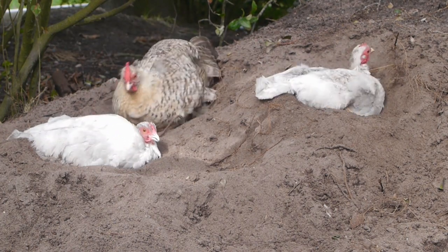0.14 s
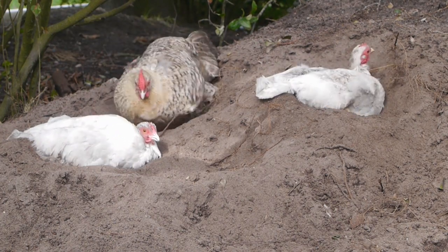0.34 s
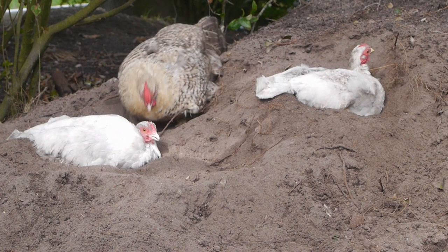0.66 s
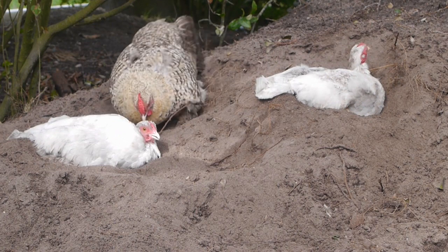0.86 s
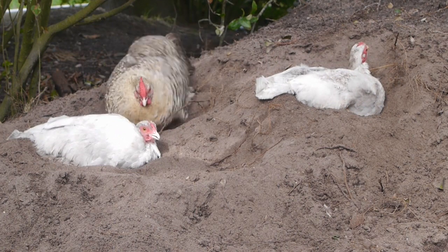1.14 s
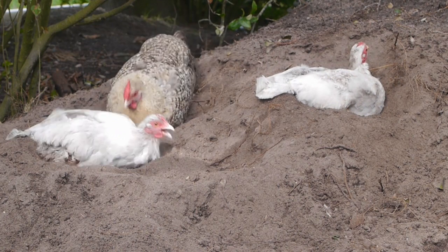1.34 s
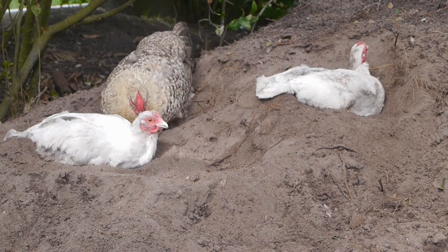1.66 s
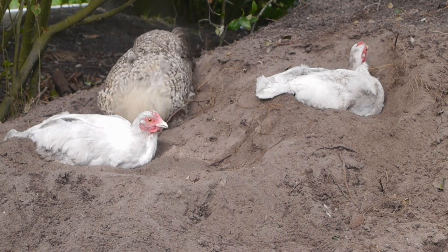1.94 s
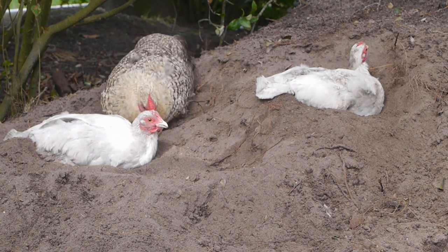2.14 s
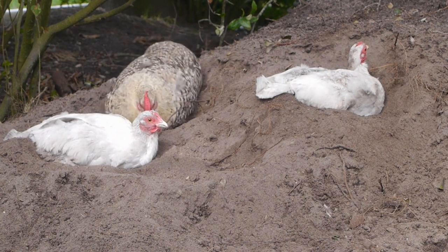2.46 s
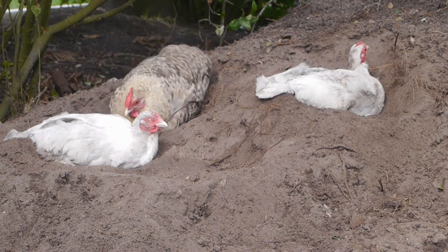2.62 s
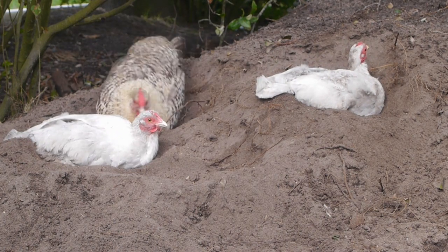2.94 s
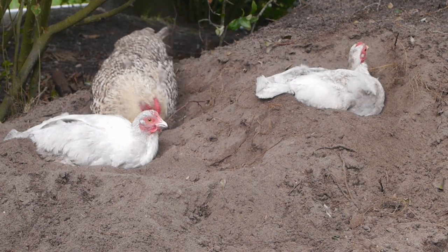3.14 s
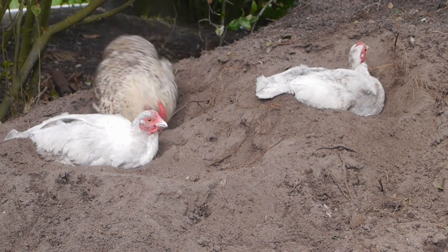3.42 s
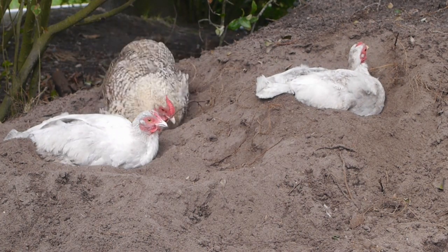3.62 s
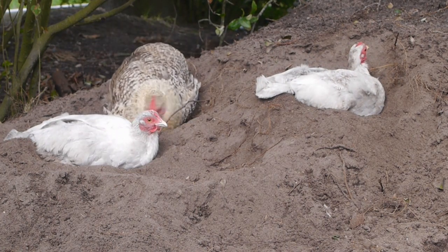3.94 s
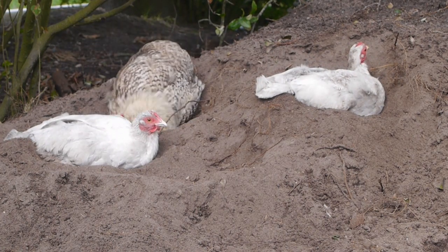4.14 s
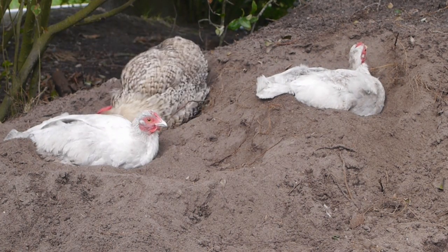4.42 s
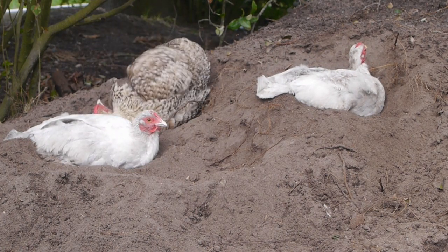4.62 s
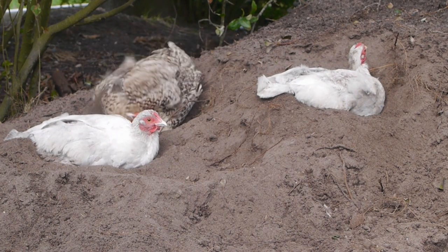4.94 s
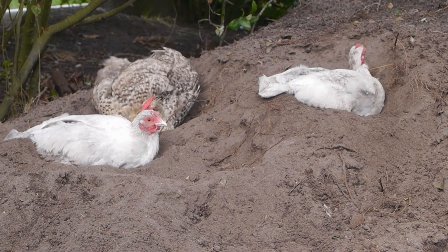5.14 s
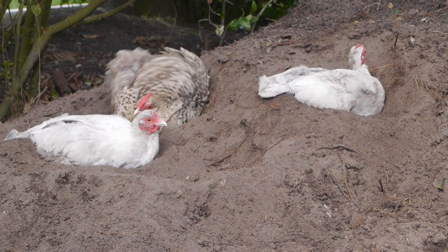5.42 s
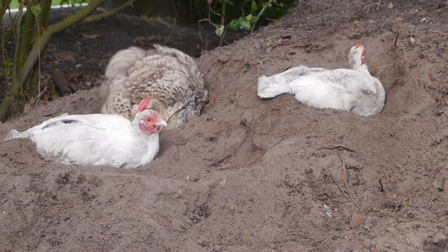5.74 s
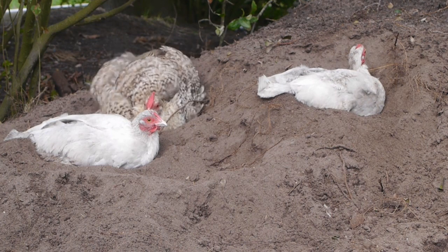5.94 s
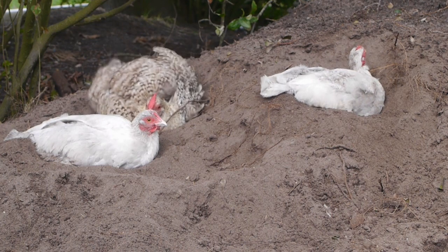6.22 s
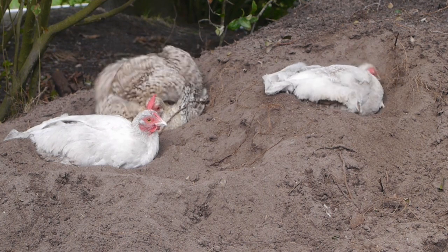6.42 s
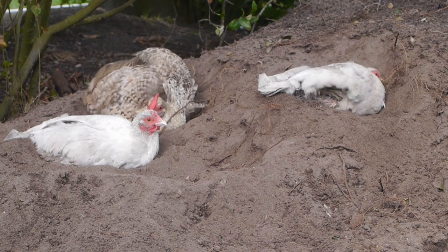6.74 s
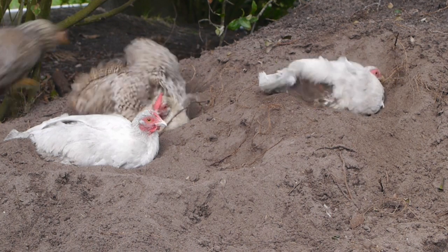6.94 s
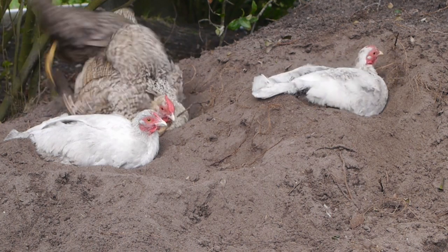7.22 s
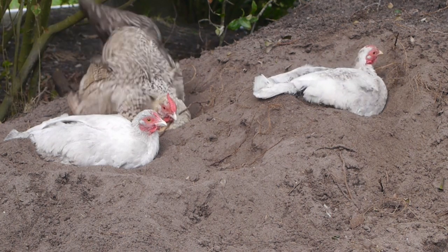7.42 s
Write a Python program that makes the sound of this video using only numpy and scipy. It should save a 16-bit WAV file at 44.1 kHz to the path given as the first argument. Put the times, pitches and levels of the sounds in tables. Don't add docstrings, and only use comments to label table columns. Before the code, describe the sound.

Two hens call in the first two seconds: low, wavering croons mixed with thin squeals breaking into yelps, then one explosive squawk, after which the background hiss briefly dips. Croons return around three seconds with a distant songbird. A lull follows, then a cluster of low clucks and a brief rough rasp from a third hen. Fairly close microphones in a slightly echoing yard, with leaves, distant traffic and occasional small pecks.

```python
import sys
import numpy as np
from scipy import signal
from scipy.fft import rfft, irfft
from scipy.io import wavfile
from scipy.ndimage import uniform_filter1d

SR = 44100
rng = np.random.default_rng(int(sys.argv[2]) if len(sys.argv) > 2 else 0)


def transcribe(u):
    v = np.clip(np.atleast_2d(u).T, -1, 1)
    q = np.round(v * 32767).astype(np.int16)
    wavfile.write(sys.argv[1], SR, q)


def gain_from_db(level_db):
    decades = np.asarray(level_db, float) / 20
    return 10 ** decades


N = 333837


def evened(x):
    return x / np.sqrt(np.mean(x ** 2) + 1e-20)


def read_curve(points, hz):
    f, value = np.transpose(points)
    return np.interp(np.log(hz + 1), np.log(f + 1), value)


def add(mix, start_s, sound):
    part = mix[round(start_s * SR):][:len(sound)]
    part += sound[:len(part)]


def wander(size, hz):
    low_pass = signal.butter(N=2, Wn=2 * hz / SR)
    return evened(signal.lfilter(*low_pass, rng.standard_normal(size + 800))[800:])


def unrolled(rows):
    s, *columns = np.transpose(rows)
    t = np.arange(s[0], s[-1], 1 / SR)
    return [t] + [np.interp(t, s, c) for c in columns]


def syllable(start, length, peak_db, hz, rule):
    attack, hold, start_db, end_db, rough_top, rough_ends, fall_db = rule
    share = np.clip([0, attack, attack + hold, 1], [0, .05, .1, 1], [0, .9, .97, 1])
    s = start + length * share
    ends = np.array([1, 0, 0, 1])
    level_db = peak_db + np.array([start_db, 0, 0, end_db])
    rough = np.abs(np.where(ends, rough_ends, rough_top))
    return unrolled(np.transpose([s, hz(s - start, ends), level_db, rough])) + [fall_db]


def voice(hz, level_db, rough, fall_db, throat, jitter, smear, uneven_db, rush):
    size = len(hz)
    shaken_hz = hz * (1 + jitter * rough * wander(size, 125) + 0.013 * wander(size, 86))
    turns = np.cumsum(shaken_hz) / SR
    out, power = np.zeros(size), np.zeros(size)
    for k in range(1, 17):
        weight = gain_from_db(read_curve(throat, k * hz) - 2 * fall_db * (1 - 1 / k)) * (k * hz < 14000)
        fuzz = wander(size, smear * hz.mean()) + 1j * wander(size, smear * hz.mean())
        share = np.clip(rough * k ** 0.59, 0, 1)
        shake = np.sqrt(1 - share ** 2) + share * fuzz / np.sqrt(2)
        shake *= gain_from_db(uneven_db * (k > 1) * np.clip(wander(size, 13.5), -2, 2))
        tone = np.exp(2j * np.pi * (k * turns + 0.56 * rng.random()))
        out += weight * (shake * tone).real
        power += weight ** 2 / 2
    air = rfft(rng.standard_normal(size)) * gain_from_db(read_curve(throat, np.fft.rfftfreq(size, 1 / SR)))
    out += rush * rough * np.sqrt(power) * evened(irfft(air, size))
    edge = signal.windows.tukey(size, min(1, 250 / size))
    return gain_from_db(level_db) * out / np.sqrt(power) * edge


# pitch_hz, level_db (per Hz)
HISS_COLOUR = [(15, -45), (25, -26), (55, -36), (101, -7), (156, -24), (193, -6.5), (246, -16.5), (368, -4),
               (495, -6), (782, -2.5), (1170, -2.5), (1340, -4.5), (2120, -8.5), (6910, -13.5),
               (15500, -33)]
HISS_DB = -44.5
# time_s, treble_db
BREEZE = [(0.0, -3.5), (0.6, -1.5), (1.3, -1.5), (2.0, 0), (4.1, -1.2), (5.5, -4.5), (6.8, -2.4),
          (7.57, 1.5)]
# start_s, length_s, rise_db
RUSTLES = [(1.487, 0.16, 6.5), (5.684, 2.24, 1.3)]
# pitch_hz, left_right_likeness (1 = same, below 0 = opposite phase)
LIKENESS = [(60, 0.152), (99, 0.7), (160, 0.83), (270, 0.6943), (450, 0.45), (740, -0.0068), (1220, -0.03),
            (2010, -0.33), (3330, -0.16), (5500, 0.067), (9080, 0.2), (15000, -0.14)]


def hiss():
    frames, hz = N // 256 + 5, np.fft.rfftfreq(1024, 1 / SR)
    a, b, c, d, patches = rng.standard_normal((frames, 513, 5)).T
    patches = evened(uniform_filter1d(uniform_filter1d(patches, size=14, axis=0), size=12, axis=1))
    flicker = evened(uniform_filter1d(rng.standard_normal(frames), size=4))
    t = np.arange(frames) * 256 / SR
    leaves_db = np.interp(t, *np.transpose(BREEZE))
    rustle_db = sum(db * np.sin(np.pi * np.clip((t - s) / length, 0, 1)) for s, length, db in RUSTLES)
    treble = np.clip(hz / 5000 - .7, 0, 1)[:, None]
    middle = np.clip(hz / 2500, 0, 1)[:, None] * (1 - treble)
    same = np.clip(read_curve(LIKENESS, hz), -1, 1)[:, None]
    left = a + 1j * b
    right = same * left + np.sqrt(1 - same ** 2) * (c + 1j * d)
    level_db = read_curve(HISS_COLOUR, hz)[:, None] + 1.07 * patches
    level_db = level_db + treble * (leaves_db + 1.23 * flicker) + middle * rustle_db
    z = np.array([left, right]) * gain_from_db(level_db)
    return gain_from_db(HISS_DB + 2.5) * evened(signal.istft(z, nperseg=1024, noverlap=768)[1][:, :N])


# pitch_hz, t60_s
YARD_DECAY = [(300, 0.098), (1000, 0.26), (2000, 0.17), (4000, 0.4), (8000, 0.41), (12000, 0.12)]


def yard(x):
    taps = np.zeros((2, SR))
    at = np.arange(400, SR - 20, 20) + rng.integers(0, 20, (2, (SR - 401) // 20))
    np.put_along_axis(taps, at, rng.choice([-1., 1.], at.shape), 1)
    taps[1] = 0.45 * taps[0] + 1.04 * taps[1]
    hz, t, z = signal.stft(taps, SR, nperseg=256)
    decay = gain_from_db(-60 * t / read_curve(YARD_DECAY, hz)[:, None])
    tail = signal.istft(z * decay, SR, nperseg=256)[1]
    return signal.fftconvolve(x[None], tail / np.linalg.norm(tail[0]), axes=1)[:, :N]


# start_s, length_s, first_hz, last_hz, level_db
BIRD_NOTES = [
    (3.202, 0.052, 6350, 6130, -49),
    (3.34, 0.044, 6500, 5870, -49),
    (3.497, 0.092, 6140, 5050, -54),
    (3.65, .06, 5740, 5170, -57),
]


def songbird():
    out = np.zeros(N)
    for s, length, first_hz, last_hz, db in BIRD_NOTES:
        hz = np.linspace(first_hz, last_hz, round(length * SR))
        add(out, s, gain_from_db(db) * np.hanning(len(hz)) * np.sin(2 * np.pi * np.cumsum(hz) / SR))
    return out


# start_s, knock_db, thud_db (low push), crack_db (dry tick)
PECKS = [
    (.485, -60, 8, -8),
    (1.767, -27, -44, -32),
    (4.09, -55, -40, 14),
    (6.778, -48, -30, 7),
    (7.329, -50, -30, 5),
]


def pecks():
    out, t = np.zeros(N), np.arange(900) / SR
    for s, db, thud_db, crack_db in PECKS:
        tick = gain_from_db(crack_db) * rng.standard_normal(len(t)) * np.exp(-t / 0.0019)
        tick += 1.1 * np.sin(2 * np.pi * 1300 * t) * np.exp(-t / 0.0011)
        thud = gain_from_db(thud_db) * np.sin(2 * np.pi * 60 * t) * np.hanning(len(t))
        add(out, s, gain_from_db(db) * (tick + thud))
    return out


# time_s, pitch_hz, level_db, roughness (0-1), overtone_fall_db
RASP = [
    (7.036, 371, -39, 0.45, -9),
    (7.055, 370, -34.5, .35, -3),
    (7.1, 356, -27.5, 0.42, -4),
    (7.148, 352, -29.5, 0.56, 4),
    (7.168, 340, -52, 0.8, 8),
]
# pitch_hz, gain_db
RASP_THROAT = [(350, -27), (730, 1), (1050, -3), (1400, 5), (1800, -8), (2300, -5), (3500, -17.5),
               (7000, -17), (12000, -28)]
THROB_FROM_S, THROB_HZ, THROB_DB, THROB_FALL_DB = 7.022, 52, 2.2, 7


def third_hen():
    out = np.zeros(N)
    t, hz, level_db, rough, fall_db = unrolled(RASP)
    throb = np.cos(2 * np.pi * THROB_HZ * (t - THROB_FROM_S) + .5 * wander(len(t), 25))
    level_db = level_db + THROB_DB * throb
    fall_db = fall_db + THROB_FALL_DB * throb
    add(out, t[0], voice(hz, level_db, rough, fall_db, RASP_THROAT,
                         jitter=.09, smear=.3, uneven_db=2.5, rush=.65))
    return out


SLACK_HZ, SLACK_ROUGH, TIGHT_HZ, TIGHT_ROUGH = 172, .42, 230, .1


def slack(hz):
    return np.interp(hz, [SLACK_HZ, TIGHT_HZ], [SLACK_ROUGH, TIGHT_ROUGH])


# time_s, pitch_hz, level_db
CROONS = [
    [(0, 206, -34), (.05, 229.7, -35), (.1, 231.7, -31.5), (.165, 240.3, -35.5), (.195, 275, -35),
     (.225, 237, -41)],
    [(.411, 169.6, -35.5), (.435, 158.8, -34.5), (.465, 201.5, -26), (.5, 188, -33.5), (.52, 169.7, -36),
     (.54, 192.6, -31), (.585, 186.7, -34.5)],
    [(1.605, 194, -41.5), (1.64, 159.2, -36.5), (1.69, 164.5, -34.5), (1.715, 242.7, -33.5),
     (1.74, 245, -42), (1.77, 195, -32.5), (1.815, 177, -43)],
    [(2.86, 206.8, -33.5), (2.895, 174.3, -32), (2.92, 205.6, -34.5), (2.945, 173.7, -33.5),
     (2.97, 228, -33), (3.0, 267.7, -34), (3.045, 201.6, -32)],
    [(3.04, 207.3, -30), (3.075, 249.4, -35.5), (3.1, 231.5, -28.5), (3.13, 167.6, -30.5),
     (3.165, 195.4, -35), (3.195, 225.7, -32.5), (3.22, 185.5, -37.5), (3.25, 243, -34)],
    [(3.245, 233, -46.5), (3.275, 226.3, -33.5), (3.31, 223.5, -33.5), (3.335, 227, -52)],
]
CROON_CLOSURE_DB = [3, -5.5, .4, 1.5, 2.2, 6]
# start_s, length_s, peak_db, pitch_hz, closure_db (extra fall of overtones)
CLUCKS = [(1.207, .055, -31.5, 194, 5), (1.306, 0.074, -35, 178, -1), (1.836, 0.093, -38.5, 195.7, 0),
          (4.828, 0.023, -44, 370, 13), (5.48, 0.031, -42.5, 364, 23), (5.668, 0.088, -47.5, 238.4, 12),
          (5.81, 0.045, -32, 189.3, -2), (5.887, 0.057, -29.5, 297.4, -4), (5.973, 0.049, -29.5, 301, -4),
          (6.063, 0.036, -26.5, 344, 4.5), (6.18, 0.039, -30, 305, -4.5), (6.451, 0.096, -47.5, 206, 13),
          (6.947, .05, -42.5, 464, 2), (7.314, 0.056, -45.5, 481, -11)]
# attack_share, hold_share, start_db, end_db, held_roughness, end_roughness, overtone_fall_db
CLUCK_SHAPE = (.27, .2, -10, -15, .03, .25, 0)
CLUCK_SAG = 0.036
# pitch_hz, gain_db
LOW_THROAT = [(170, -34), (240, -15), (320, 0), (450, 1.5), (580, 0), (720, 4), (880, -4), (1020, 4),
              (1200, -15), (1450, -13), (1900, -28), (3000, -32.5)]


def low_hen():
    out, calls = np.zeros(N), []
    for rows, closure_db in zip(CROONS, CROON_CLOSURE_DB):
        t, hz, level_db = unrolled(rows)
        calls.append((t, hz, level_db, slack(hz), closure_db))
    for start, length, peak_db, top_hz, closure_db in CLUCKS:
        t, hz, level_db, rough, fall_db = syllable(
            start, length, peak_db, lambda s, ends: top_hz * (1 - CLUCK_SAG * ends), CLUCK_SHAPE)
        calls.append((t, hz, level_db, rough + slack(hz), fall_db + closure_db))
    for t, hz, level_db, rough, fall_db in calls:
        add(out, t[0], voice(hz, level_db, rough, fall_db, LOW_THROAT,
                             jitter=0.173, smear=0.37, uneven_db=1.66, rush=0.3))
    return out


# time_s, pitch_hz, level_db
WHISTLES = [
    [(.067, 1870, -41), (.078, 2860, -48.5), (.103, 2890, -49), (.115, 1500, -38)],
    [(.52, 2746, -59), (.555, 2650, -38), (.63, 2920, -32), (.69, 2724, -34), (.71, 2350, -46),
     (.721, 1440, -20)],
    [(.864, 1890, -35), (.876, 2750, -41), (.91, 2800, -37), (.931, 2656, -42.5), (.953, 2470, -43)],
    [(1.298, 2354, -37), (1.32, 2800, -29), (1.338, 3110, -22), (1.355, 3270, -20), (1.368, 3220, -10),
     (1.372, 2700, -10)],
]
WHISTLE_ROUGH = 0.13
WHISTLE_FALL_DB = [-3.5, 1, -0.5, -4.5]
# time_s, pitch_hz, level_db, roughness (0-1)
SQUAWKS = [
    [(1.337, 1520, -23, 0.54), (1.347, 1603, -25.5, 0.2), (1.367, 1644, -20.5, 0.26), (1.373, 1130, -15, 0)],
    [(1.369, 1109, -4.5, .8), (1.385, 1049, -6, 0.47), (1.395, 993, -3.5, 0.13), (1.414, 985, -8, 0),
     (1.43, 953, -12.5, 0.4), (1.5, 970, -33, 0.87)],
]
SQUAWK_FALL_DB = [-14, -7.5]
HALF_PITCH_DB = [-16, -25]
RASP_LIFT_DB = 14.5
# start_s, length_s, peak_db, first_hz, last_hz
CHEST_NOTES = [
    (.297, 0.026, -38, 466, 500),
    (.724, 0.021, -22.5, 581, 458.5),
    (.833, 0.017, -31, 427, 573),
    (.988, 0.012, -31.5, 505, 410),
    (1.257, 0.0174, -29.5, 423, 840),
]
YELP_NOTES = [
    (.717, 0.01, -24.5, 1390, 574),
    (.848, 0.029, -19, 994, 985),
    (1.274, 0.04, -18.5, 975, 1087),
]
BLIP_NOTES = [
    (.326, 0.035, -24, 871, 932),
    (.328, 0.017, -19, 1720, 1760),
    (1.369, 0.025, 2, 2127, 2177),
    (1.768, 0.019, -21.5, 508, 403),
    (3.124, 0.031, -24.5, 813, 790),
]
GLIDE_NOTES = [
    (.305, 0.023, -37, 1675, 1490),
    (1.738, .03, -17.5, 1800, 1342),
]
# attack_share, hold_share, start_db, end_db, held_roughness, end_roughness,
# overtone_fall_db
CHEST_SHAPE = (0.9, -0.8, 2, -3, 0.02, 1.37, 15.5)
YELP_SHAPE = (0.16, -1, -5, -10.5, -0.12, 0.17, 6.5)
BLIP_SHAPE = (-2.54, 0.46, -27, -15, -0.17, 0.87, 18)
GLIDE_SHAPE = (.75, .2, -24, -1, .05, .03, 17)


def high_calls():
    calls = [unrolled(rows) + [WHISTLE_ROUGH, fall_db] for rows, fall_db in zip(WHISTLES, WHISTLE_FALL_DB)]
    for rows, fall_db, half_db in zip(SQUAWKS, SQUAWK_FALL_DB, HALF_PITCH_DB):
        t, hz, level_db, rough = unrolled(rows)
        lifted_db = fall_db - RASP_LIFT_DB * rough
        calls.append((t, hz, level_db, rough, lifted_db))
        calls.append((t, hz / 2, level_db + half_db, rough, lifted_db))
    registers = ((CHEST_NOTES, CHEST_SHAPE), (YELP_NOTES, YELP_SHAPE),
                 (BLIP_NOTES, BLIP_SHAPE), (GLIDE_NOTES, GLIDE_SHAPE))
    for notes, shape in registers:
        for start, length, peak_db, first_hz, last_hz in notes:
            calls.append(syllable(start, length, peak_db,
                                  lambda s, ends: first_hz + (last_hz - first_hz) * s / length, shape))
    return calls


# time_s, pitch_hz, half_length_s, swell_db
DROPS = [
    (0.074, 1430, 0.0065, 23),
    (0.093, 1455, 0.007, 29.5),
    (0.572, 1837, 0.007792, 27),
    (0.592, 1842, .0055, 26.5),
    (0.612, 2050, .004, 15),
    (0.924, 1706, 0.0061, 26),
    (0.943, 1678, 0.0095, 27.5),
]
# pitch_hz, gain_db
HIGH_THROAT = [(400, -11), (1000, 12.5), (1400, 11.5), (1900, 17.5), (2500, 2.5), (3200, 1), (3900, 1.5),
               (4900, 2), (6000, -14), (7000, -20.5), (8200, -10.5), (9500, -15.5), (11500, -17.5),
               (13800, -44)]


def high_hen():
    out = np.zeros(N)
    for t, hz, level_db, rough, fall_db in high_calls():
        for s, low_hz, half, swell_db in DROPS:
            hz = hz + (low_hz - hz) * np.exp(-((t - s) / half) ** 4)
            swell = swell_db * np.exp(-((t - s) / half / 0.99) ** 2)
            level_db = level_db + swell
            fall_db = fall_db + 0.55 * swell
            rough = rough + 0.003 * swell
        add(out, t[0], voice(hz, level_db, rough, fall_db, HIGH_THROAT,
                             jitter=0.083, smear=0.33, uneven_db=3.0, rush=0.18))
    return out


def placed(x, pan_db, bounce_db, left_s, right_s):
    late = np.array([np.roll(x, round(s * SR)) for s in (left_s, right_s)])
    return (x + gain_from_db(bounce_db) * late) * gain_from_db(np.array([[pan_db], [-pan_db]]) / 2)


def scene():
    cut = signal.butter(N=3, Wn=2 * 210 / SR, btype="high")
    steep = signal.butter(N=4, Wn=2 * 330 / SR, btype="high")
    bird, ticks = songbird(), pecks()
    low = signal.lfilter(*cut, low_hen())
    high = signal.lfilter(*steep, high_hen() + third_hen())
    mix = hiss() + yard(gain_from_db(-10.5) * low + gain_from_db(-11.0) * high + bird + gain_from_db(-9) * ticks)
    mix += placed(bird, pan_db=0.39, bounce_db=-9, left_s=.002, right_s=0.0038)
    mix += placed(low, pan_db=-0.3, bounce_db=-22.0, left_s=0.00163, right_s=0.00195)
    mix += placed(high + ticks, pan_db=-0.1434, bounce_db=-11.5, left_s=0.001105, right_s=0.00122)
    return mix


def top_cut(x):
    return signal.sosfilt(signal.butter(12, 15630, fs=SR, output="sos"), x)


def record(dry):
    power_db = 10 * np.log10(abs(uniform_filter1d((dry ** 2).mean(0), size=600)) + 1e-12)
    fall = np.arange(N) * 26.6 / SR
    over_db = np.maximum(np.maximum.accumulate(power_db + fall) - fall + 13.5, 0)
    held = np.clip(dry / gain_from_db(0.68 * uniform_filter1d(over_db, size=200)), -.94, .94)
    band_limit = signal.firwin(numtaps=255, cutoff=15550, fs=SR)
    held = signal.oaconvolve(held, band_limit[None], "same")
    return top_cut(held)


dry = scene()
out = record(dry)
transcribe(out)
```